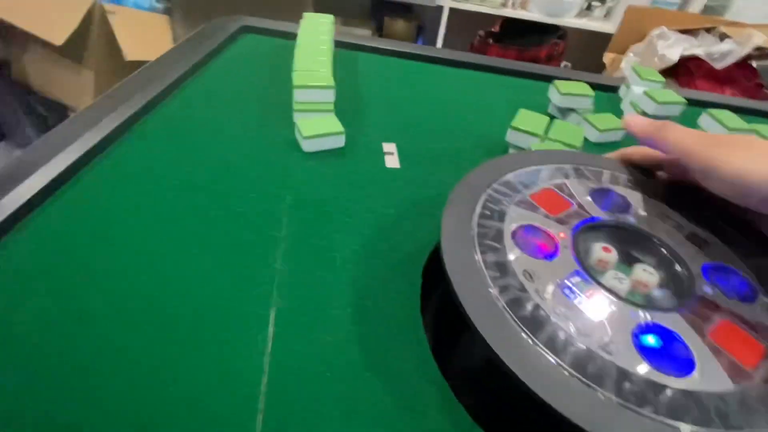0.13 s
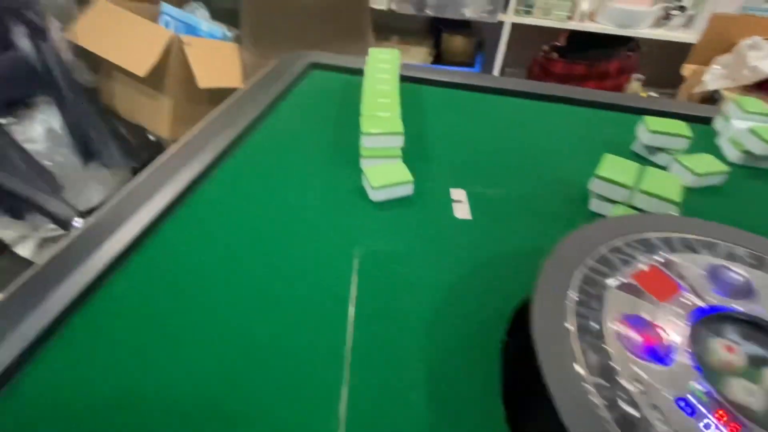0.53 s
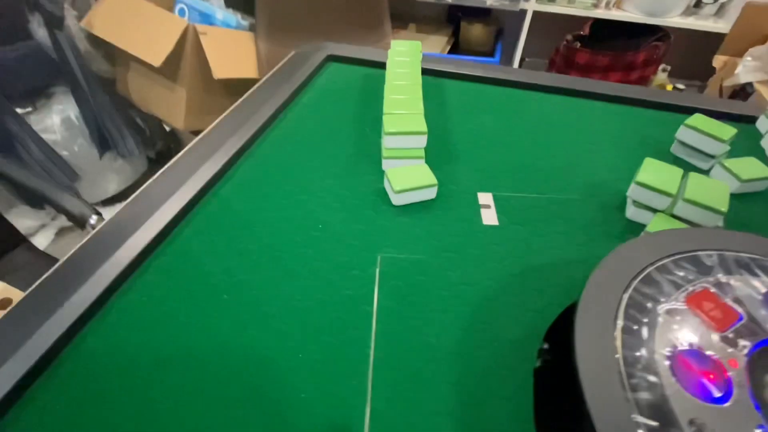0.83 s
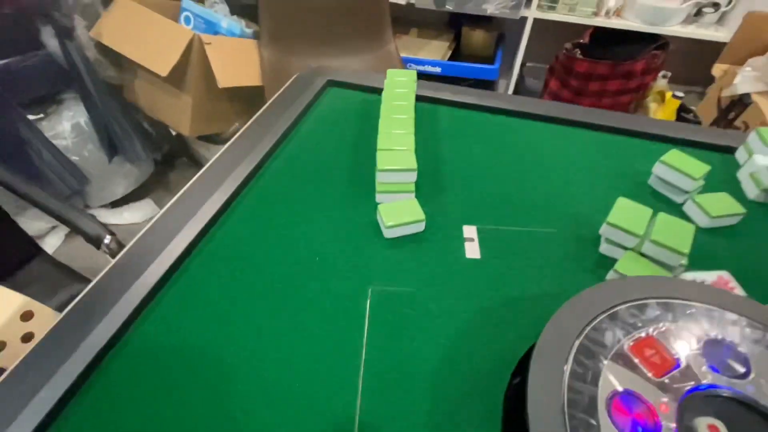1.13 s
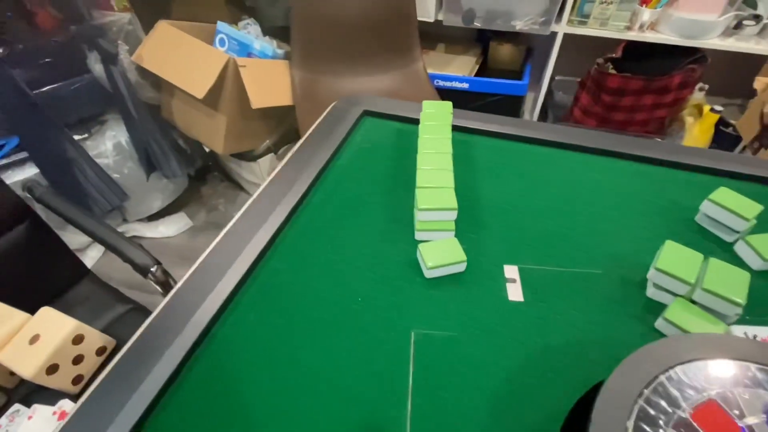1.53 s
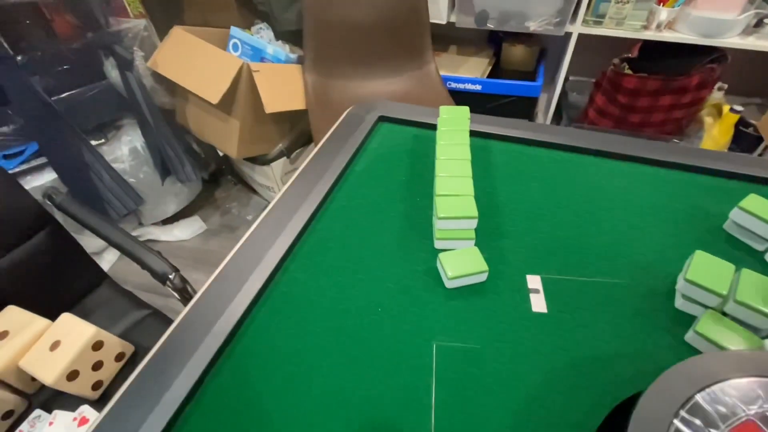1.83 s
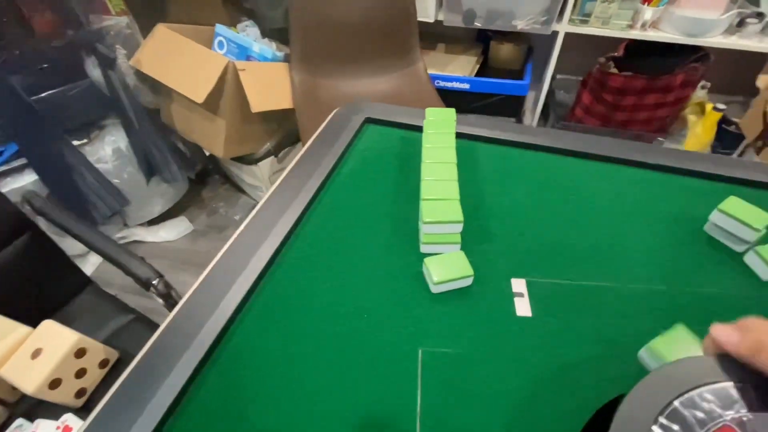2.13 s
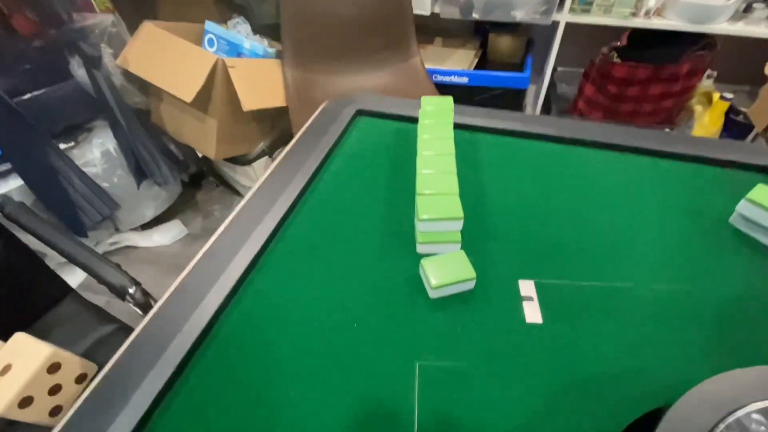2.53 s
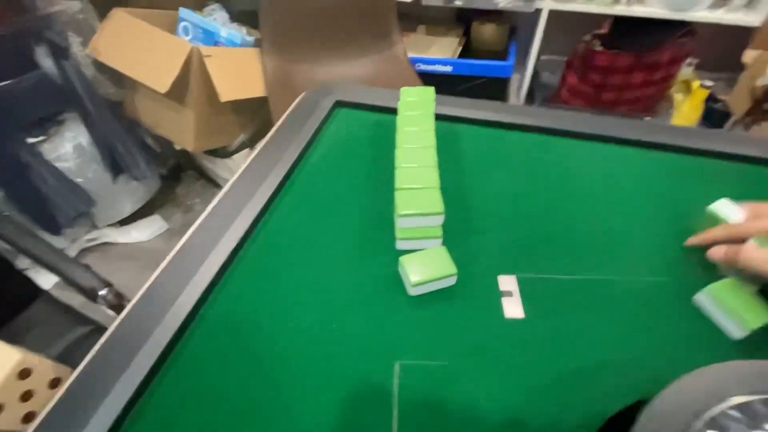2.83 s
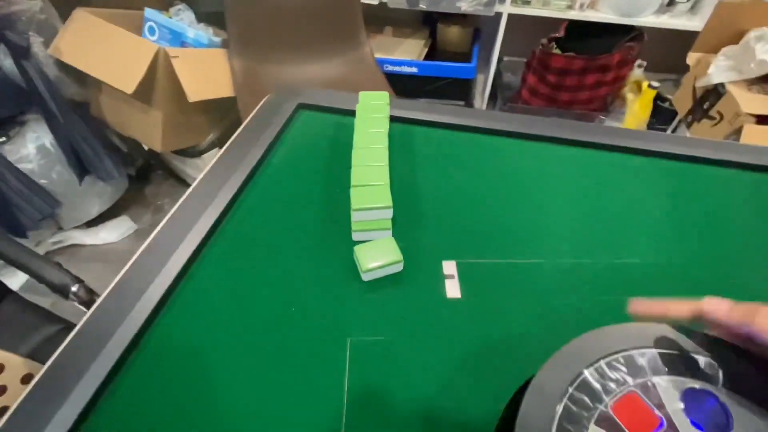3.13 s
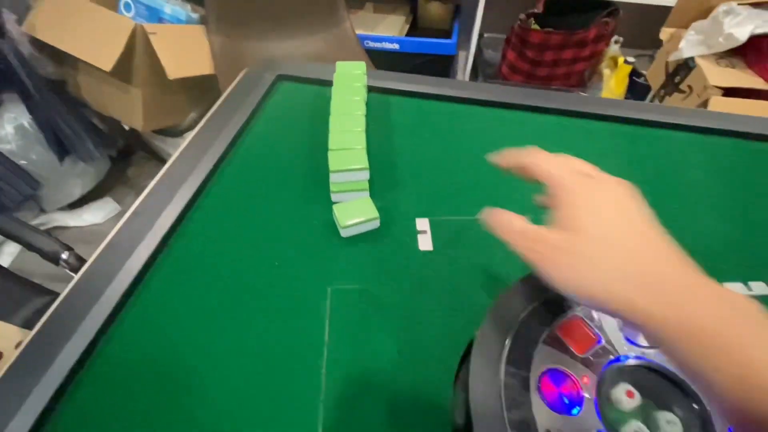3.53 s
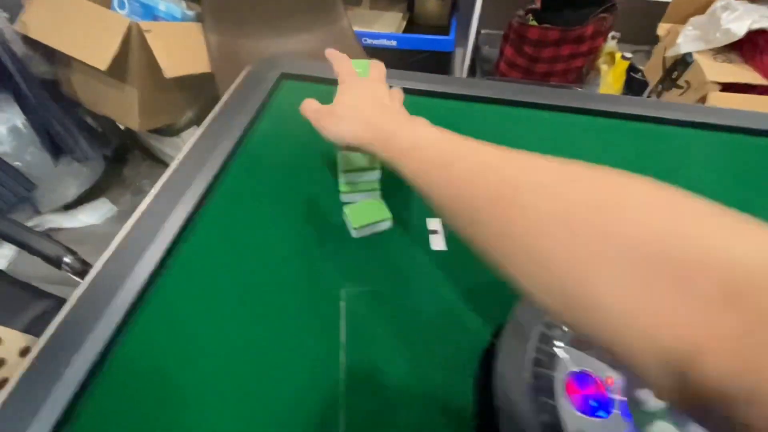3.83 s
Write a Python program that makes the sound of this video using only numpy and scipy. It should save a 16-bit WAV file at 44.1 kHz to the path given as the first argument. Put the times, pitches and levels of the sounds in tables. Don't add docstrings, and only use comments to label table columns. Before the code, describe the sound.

Mahjong tiles clatter in bursts into a hollow table drum, knocking and clicking over faint hum

```python
import sys
import numpy as np
from scipy import signal
from scipy.fft import rfft, irfft, next_fast_len
from scipy.io import wavfile
from scipy.ndimage import map_coordinates

SR = 44100
rng = np.random.default_rng(int(sys.argv[2]) if len(sys.argv) > 2 else 0)


def generate_wav(sig):
    pcm = np.round(np.clip(np.atleast_2d(sig).T, -1, 1) * 32767).astype(np.int16)
    wavfile.write(sys.argv[1], SR, pcm)


def undo_db(level):
    steps = np.asarray(level, float) / 20
    return 10 ** steps


N = 176400

# centre in Hz, width in Hz, level in dB.
DRUM_LOW_MODES = [(146.1, 11, -0.5), (188.7, 13, -12.5)]
# centre in Hz, width in Hz, level in dB.
DRUM_HIGH_MODES = [(266.9, 45.6, -2), (357.7, 23.2, 1.5), (421, 117, -7.5), (561, 20, -6)]
# centre in Hz, width in Hz, level in dB.
TRAY_MODES = [(817, 300, -11), (918, 133, -0.5), (1080, 77, -0.5), (1280, 130, -0.5), (1573, 393, -2.5),
              (1980, 506, -3.5)]
BLUNT_EDGE_DB = -37


def unit(x):
    return x / np.sqrt(np.mean(x ** 2) + 1e-20)


def along(points, hz):
    f, v = np.transpose(points)
    return np.interp(np.log(hz + 1), np.log(f + 1), v)


def wobble(rate_hz):
    knots = rng.standard_normal(int(N * rate_hz / SR) + 4)
    return map_coordinates(knots, [np.arange(N) * rate_hz / SR])


def filtered(x, response):
    size = next_fast_len(N + SR // 2)
    spectrum = rfft(x, size) * response(np.fft.rfftfreq(size, 1 / SR))
    return irfft(spectrum, size)[..., :N]


def body(modes):
    def response(f):
        total = 0
        for k, (hz, width_hz, db) in enumerate(modes):
            damping = 1j * f * width_hz
            total = total + (-1) ** k * undo_db(db) * damping / (hz * hz - f * f + damping)
        return total
    return response


def blows(s, gain):
    return np.bincount(np.clip((s * SR).astype(int), 0, N - 1), gain, N)


def dying(x, t60_s):
    return signal.lfilter([1], [1, -undo_db(-60 / (t60_s * SR))], x)


def rings(s, gain, hz, t60_s, size):
    strike_s = 0.000072
    t = np.arange(size) / SR
    tone = np.sin(2 * np.pi * np.minimum(hz, SR / 2.2)[:, None] * t)
    wave = gain[:, None] * tone * undo_db(-60 * t / t60_s) * (1 - np.exp(-t / strike_s))
    at = (s * SR).astype(int)[:, None] + np.arange(size)
    return np.bincount(at.ravel(), wave.ravel(), N + SR)[:N]


def shower(rate_hz, size_db):
    u = rng.random((5000, 3))
    s = np.cumsum(-np.log(1 - u[:, 0])) / rate_hz
    keep = s < N / SR
    size = undo_db(-size_db * np.log(1 - .95 * u[keep, 1]))
    spread = np.log(u[keep, 2] / (1 - u[keep, 2])) / 1.732
    return s[keep], size, spread


def soft(x):
    low_cut_hz, push_s = 85, 0.0007
    return filtered(x, lambda f: (1j * f / (low_cut_hz + 1j * f) / (1 + 1j * np.pi * f * push_s)) ** 2)


def drum():
    # start in seconds, peak in dB, upper modes over the lowest in dB.
    thuds = [(0.2, -7.5, -16.5), (0.287, -8, -12), (0.351, 0.5, -23.5), (0.382, 5.5, -25),
             (0.463, 1.5, -17), (0.522, 3.5, -23), (0.639, 0, -16), (0.713, 1, -63), (0.861, -28, 7),
             (1.247, -14.5, -14.5), (1.428, -14.5, -8.5), (1.498, 3.5, -22), (1.664, -13, -8),
             (1.72, -5.5, -10.5), (2.01, -13, -26), (2.228, -17, -2.5), (2.389, -4, -3), (2.449, 2, -24),
             (2.581, -18, -44), (2.594, 3.5, -34), (2.657, -6, -18.5), (2.852, -4.5, -15.5),
             (3.146, -1.5, -16), (3.252, -2.5, -14.5), (3.37, 2, -28.5), (3.427, 3.5, -15.5),
             (3.61, -11, -12), (3.676, -9.5, -27), (3.727, -23.5, -1.5), (3.788, -22, -16),
             (3.87, -23, -20)]
    thud_db, spot_scatter_db = 7.5, 4
    s, db, upper_db = np.transpose(thuds)
    low = filtered(blows(s, undo_db(db + thud_db + 37.5)), body(DRUM_LOW_MODES))
    spot_db = spot_scatter_db * rng.standard_normal((len(s), len(DRUM_HIGH_MODES)))
    upper = 0
    for k, mode in enumerate(DRUM_HIGH_MODES):
        hits = blows(s, undo_db(db + upper_db + spot_db[:, k] + thud_db + 42))
        upper = upper + (-1) ** k * filtered(hits, body([mode]))
    return soft(low + upper)


def tray():
    # start in seconds, peak in dB, ring in Hz.
    knocks = [(0.196, -6.5, 1230), (0.245, -6.5, 947), (0.256, -4.5, 1290), (0.389, -13, 1160),
              (0.594, -15.5, 954), (0.637, -4, 1080), (0.764, -7, 1080), (1.054, -9, 1490),
              (1.246, -11, 916), (1.313, -16, 930), (1.325, -5.5, 1024), (1.378, -6.5, 1000),
              (1.467, -4.5, 1280), (1.596, -13, 1190), (2.272, -8, 970), (2.35, -10, 1124),
              (2.846, -7, 1015), (2.993, -17.5, 1020), (3.148, -9, 960), (3.236, -5.5, 1330),
              (3.253, -4, 1025), (3.363, -8.5, 960), (3.438, -9.5, 907)]
    ring_t60_s, modes_db, crack_db = 0.023, 25, -22
    s, db, hz = np.transpose(knocks)
    crack = tile_clicks(s, undo_db(db + crack_db), 2.9 * hz, BLUNT_EDGE_DB)
    ring = rings(s, 0.88 * undo_db(db), hz, ring_t60_s, size=2500)
    return ring + filtered(blows(s, undo_db(db + modes_db)), body(TRAY_MODES)) + crack


def clicks():
    # start in seconds, peak in dB, ring in Hz, edge brightness in dB.
    early = [(0.0231, -11.5, 4300, -34), (0.0317, -11.5, 4700, -19), (0.0847, -9, 3930, -24),
             (0.162, -14, 4480, -28), (0.1772, -10.5, 4030, -30), (0.1859, -14, 4150, -35),
             (0.1945, -12, 4210, -18), (0.242, -5.5, 2080, -22), (0.2698, -10, 5200, -11),
             (0.2877, -6.5, 3400, -13), (0.2952, -8, 4090, -8), (0.379, -22, 3040, -14),
             (0.4188, -19, 2380, -11), (0.4766, -13, 3860, -23), (0.5561, -12.5, 4020, -25),
             (0.5927, -11.5, 2080, -18.5), (0.61, -25, 2220, -15), (0.6988, -20.5, 2260, -25),
             (0.7141, -12, 4150, -29), (0.844, -37, 4060, 8), (0.8619, -17, 2090, -47),
             (0.9017, -11.5, 1980, -34), (0.9126, -11, 2440, -38), (0.9218, -7.5, 2640, -21.5),
             (0.9325, -15, 2110, -35), (0.9937, -17.5, 2470, -33), (1.0296, -11.5, 2140, -38),
             (1.1002, -22.5, 2500, -55), (1.243, -19, 4200, -4.5), (1.2558, -22, 4140, -9),
             (1.3255, -20, 2640, -11), (1.3553, -15.5, 4000, -16), (1.3873, -9.5, 3880, -20),
             (1.4115, -10, 3500, -22), (1.4601, -16, 2370, -6), (1.5423, -16, 3750, -16),
             (1.5702, -11.5, 4180, -5.5), (1.6258, -22, 2030, -16), (1.6547, -11, 3660, -28),
             (1.7036, -15.5, 4300, -29), (1.7599, -18, 3600, -12)]
    # start in seconds, peak in dB, ring in Hz, edge brightness in dB.
    late = [(2.0203, -9, 2980, -39), (2.024, -16, 2700, -27), (2.1927, -26, 3430, -37),
            (2.201, -16, 4560, -44), (2.2103, -9, 4030, -37), (2.2709, -10, 3660, -19),
            (2.322, -11.5, 4200, -14), (2.366, -16, 3560, -25), (2.3894, -11.5, 4200, -12.5),
            (2.4601, -10.5, 4080, -10), (2.5331, -26, 3840, -49), (2.637, -26, 4470, -49),
            (2.6489, -16.5, 3460, -51), (2.6619, -3, 2130, -46), (2.6788, -3, 2120, -62),
            (2.699, -7, 2090, -49), (2.719, -23, 2330, -43), (2.8191, -19.5, 2370, -37),
            (2.8479, -8, 2150, -38), (2.886, -17, 2560, -32), (2.898, -21, 3220, -13),
            (2.9085, -13, 2620, -40), (2.9862, -27.5, 3640, -31), (3.037, -17.5, 4300, -25),
            (3.0658, -38, 3000, -31), (3.0922, -21.5, 4200, -20), (3.1178, -20, 2350, -11),
            (3.1443, -23, 2980, -25), (3.1657, -8.5, 2230, -21), (3.1883, -11.5, 4100, -12.5),
            (3.238, -11, 2000, -13), (3.3026, -21, 2880, -23), (3.3388, -12, 2170, -7),
            (3.3593, -17, 2020, -10), (3.3844, -22.5, 3500, -1), (3.421, -9, 2780, -10),
            (3.5471, -15.5, 3670, -30), (3.5954, -25, 3720, -12), (3.6119, -15, 4170, -22)]
    # start in seconds, peak in dB, ring in Hz.
    rocking = [
        (1.9728, -16, 3100),
        (1.9884, -15, 2900),
        (2.0026, -22, 3180),
        (2.0417, -15, 3200),
        (2.0518, -19, 4370),
        (2.0687, -35, 2860),
        (2.0814, -18.5, 2350),
        (2.0954, -21, 2310),
    ]
    click_db = 2
    blunt = [(*row, BLUNT_EDGE_DB) for row in rocking]
    s, db, hz, edge_db = np.transpose(list(early) + list(late) + blunt)
    return tile_clicks(s, undo_db(db + click_db), hz, edge_db)


def tile_clicks(s, gain, hz, edge_db):
    # ratio to the ring, level in dB, t60 in seconds.
    tile_modes = [(1, 0, 0.005), (1.5, 0, 0.003), (2.15, -5, 0.002)]
    snap_db, snap_t60_s, scuff_db, scuff_t60_s = -4, .0035, -8.5, 0.013
    dull_hz, dull_below_hz, rub_db = 2800, 4300, -1.5
    edge_hz, edge_gain_db, edge_t60_s = 6770, 7, 0.015
    small_hz = 870

    chance = rng.standard_normal((5000, 9))[:len(s)]
    modes = 0
    for k, (ratio, db, t60_s) in enumerate(tile_modes):
        mode_gain = gain * undo_db(db + 3.37 * chance[:, k])
        mode_hz = hz * ratio * np.exp(0.12 * k * chance[:, 4 + k])
        modes = modes + rings(s, mode_gain, mode_hz, t60_s, size=260)

    def rub(hits):
        snap = undo_db(snap_db) * dying(hits, snap_t60_s)
        return snap + dying(hits, scuff_t60_s) * undo_db(scuff_db + 2.46 * wobble(350))

    def band(mid_hz):
        return unit(filtered(grit(), lambda f: 1 / (1 + (f / mid_hz - mid_hz / (f + 1)) ** 2) ** 1.83))

    flat = 1 / (1 + (hz / dull_below_hz) ** 4)
    scuff = rub(blows(s, gain * flat)) * band(dull_hz)
    scuff = scuff + rub(blows(s, gain * (1 - flat))) * band(2 * dull_hz)
    small = filtered(modes + undo_db(rub_db) * scuff, lambda f: (1j * f / (small_hz + 1j * f)) ** 3)
    thin = unit(filtered(grit(), lambda f: 1 / (1 + (edge_hz / (f + 1)) ** 8)))
    return small + dying(blows(s, gain * undo_db(edge_db + edge_gain_db)), edge_t60_s) * thin


def grit():
    # frequency in Hz, level in dB per Hz.
    rub_colour = [(400, -67), (1200, 11), (5000, -6), (9000, -12), (16000, -15.5)]
    return unit(filtered(rng.standard_normal(N), lambda f: undo_db(along(rub_colour, f))))


def tumble():
    chatter_hz, chatter_spread, chatter_edge_db = 3450, 0.49, -21
    chatter_db, slide_db, rattle_db, drum_db, drum_high_db = -2, -17, -6.5, -12, 7.5
    light, heavy = motion()

    s, size, pitch = shower(350, size_db=3.5)
    chatter = unit(tile_clicks(s, size, chatter_hz * np.exp(chatter_spread * pitch), chatter_edge_db))

    s, size, sign = shower(400, size_db=7.5)
    rattle = unit(filtered(blows(s, size * np.sign(sign)), body(TRAY_MODES)))
    slide = grit() * undo_db(4 * wobble(90))

    s, size, sign = shower(88, size_db=2.5)
    push = soft(blows(s, size * np.sign(sign) * heavy[(s * SR).astype(int)]))
    low = filtered(push, body(DRUM_LOW_MODES))
    high = filtered(push, body(DRUM_HIGH_MODES))
    rumble = np.std(heavy) * undo_db(drum_db) * (unit(low) + undo_db(drum_high_db) * unit(high))

    clump = undo_db(2.1 * wobble(30.774))
    tiles = light * (undo_db(chatter_db) * chatter + undo_db(slide_db) * slide)
    return clump * (tiles + heavy * undo_db(rattle_db) * rattle), rumble


def motion():
    # start in seconds, length in seconds, strength in dB, weight on tray and drum in dB.
    heaps = [(-0.005, 0.069, -27.5, -11), (0.155, 0.16, -23, 2.5), (0.375, 0.15, -27, 3.5),
             (0.564, 0.22, -36.5, 10), (0.833, 0.074, -29.5, 4), (0.974, 0.099, -39.5, 12),
             (1.233, 0.29, -28, 4.5), (1.484, 0.13, -26.5, 5.5), (1.704, 0.17, -31.5, 0),
             (1.96, 0.16, -38.5, -9), (2.191, 0.34, -30.5, 5.5), (2.346, 0.27, -34, 4.5),
             (2.662, 0.024, -31, -4.5), (2.865, 0.043, -35, -8), (2.976, 0.028, -53.5, 24.5),
             (3.116, 0.08, -33, 13.5), (3.234, 0.24, -28.5, 8.5), (3.533, 0.093, -32, 2),
             (3.685, 0.073, -37, -0.5), (3.933, 0.011, -52, 10.5)]
    rise_s, settle_db_per_s = 0.0048, 181
    s, length_s, db, weight_db = (column[:, None] for column in np.transpose(heaps))
    t = np.arange(N) / SR - s
    shape = np.clip(t / rise_s, 0, 1) * undo_db(db - settle_db_per_s * np.clip(t - length_s, 0, 1))
    light = np.sqrt((shape ** 2).sum(0))
    heavy = np.sqrt(((shape * undo_db(weight_db)) ** 2).sum(0))
    return light, heavy


def room(x, decay, step):
    delay = 40
    out = np.zeros((2, N + SR))
    for a in range(0, N, step):
        hz, t, z = signal.stft(rng.standard_normal((2, 2 * step)), SR, nperseg=128)
        fade = undo_db(-60 * t / along(decay, hz)[:, None])
        tail = signal.istft(z * fade, SR, nperseg=128)[1]
        wet = signal.fftconvolve(x[None, a:a + step], tail / np.linalg.norm(tail[0]), axes=1)
        out[:, a + delay:a + delay + wet.shape[1]] += wet
    return out[:, :N]


def hum():
    # frequency in Hz, level in dB per Hz.
    hum_colour = [(30, 0), (150, 0), (500, -3.5), (2500, -5.5), (9000, -17)]
    return undo_db(-45) * unit(filtered(rng.standard_normal((2, N)), lambda f: undo_db(along(hum_colour, f))))


def scene():
    # frequency in Hz, t60 in seconds.
    room_t60 = [(150, 0.79), (1000, 0.25), (4000, 0.35), (12000, 0.11)]
    # frequency in Hz, t60 in seconds.
    hollow_t60 = [(300, 0.028), (8000, 0.021)]
    # frequency in Hz, left-right likeness.
    likeness = [(200, 0.95), (600, 0.49), (2500, 0.019), (12000, 0.33)]
    # frequency in Hz, left over right in dB.
    port_balance = [(200, -3), (700, -3.5), (1400, 2), (3000, 4), (5500, 7), (9000, 0)]
    room_db, low_room_db, hollow_db, left_lag_s = -5, -12, -1, 0.0002

    bright, rumble = tumble()
    high = bright + tray() + clicks()
    low = rumble + drum()
    wet = room(undo_db(room_db) * high + undo_db(low_room_db) * low, room_t60, SR // 4) + hum()
    wet = wet + undo_db(hollow_db) * room(high, hollow_t60, SR // 20)

    def widen(f):
        turn = np.arccos(np.clip(along(likeness, f), -1, 1)) / 2
        return np.array([np.cos(turn), np.sin(turn)])

    mid, apart = filtered(wet, widen)
    side = np.array([[.5], [-.5]])

    def ports(f):
        lag = np.exp(-2j * np.pi * f * left_lag_s * (side + .5))
        return undo_db(side * along(port_balance, f)) * lag

    return filtered(high + low + np.array([mid + apart, mid - apart]), ports)


def roll_off(x):
    return signal.sosfilt(signal.butter(12, 16480, fs=SR, output="sos"), x)


def record(dry):
    # frequency in Hz, level in dB.
    overall_tone = [(35, 0), (90, 6), (5500, -3), (8000, -6), (10800, -12.5), (12000, -16), (14000, -5.5),
                    (15900, -30)]
    x = dry / (1 + np.abs(dry / 1.05) ** 4) ** (1 / 4)
    mix = filtered(x, lambda f: undo_db(along(overall_tone, f)))
    return roll_off(mix)


dry = scene()
out = record(dry)
generate_wav(out)
```